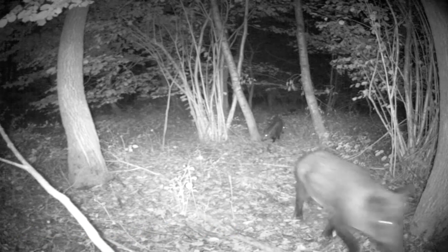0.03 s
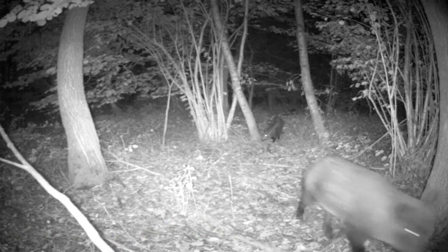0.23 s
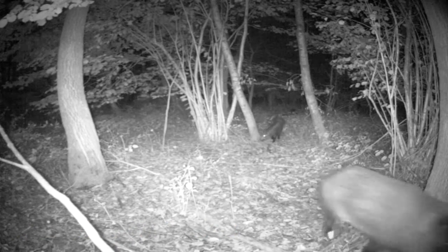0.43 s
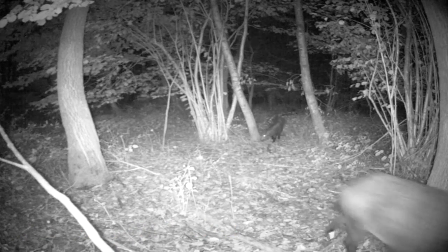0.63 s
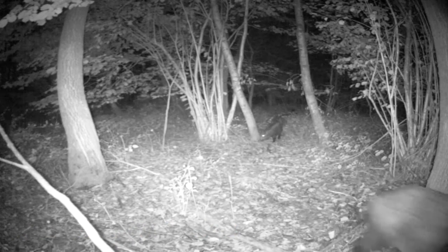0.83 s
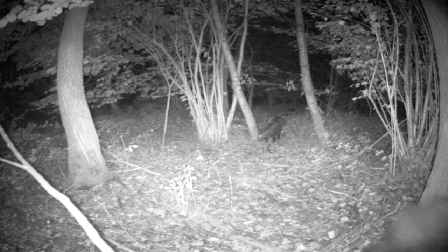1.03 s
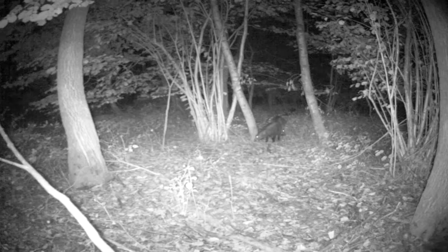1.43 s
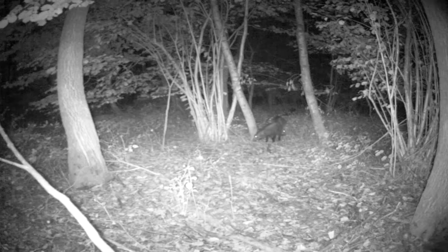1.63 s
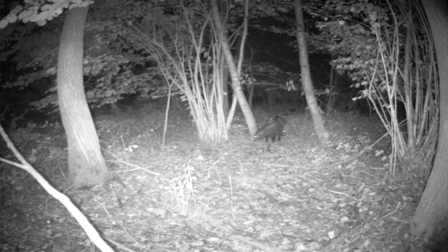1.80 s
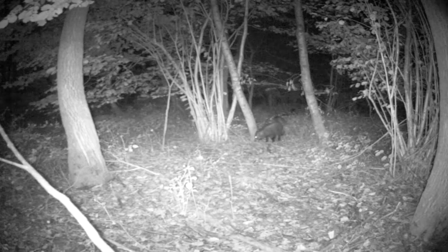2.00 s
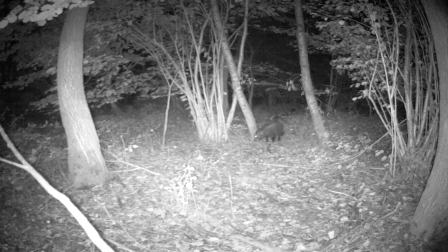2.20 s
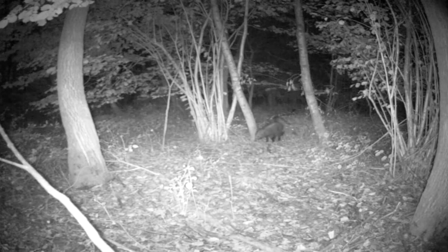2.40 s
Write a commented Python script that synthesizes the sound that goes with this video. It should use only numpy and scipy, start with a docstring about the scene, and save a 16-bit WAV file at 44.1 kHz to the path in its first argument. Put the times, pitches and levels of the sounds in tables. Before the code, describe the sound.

A wild boar walks through dry leaves, crunching them and snapping twigs with a few dull thuds. Passing close to the microphone, it gives one deep, rough grunt, then steps on through the quiet night wood.

```python
"""A wild boar walks through dry leaves past a trail camera in a quiet wood at night.
Each step crushes leaves and snaps twigs, which make the camera's housing ring. Stiff leaves scrape
and the heaviest steps thud. Just past the camera the boar gives one deep grunt: slow throat pulses
that start rough, crack a few times and end in a soft growl. Faint air and rumble lie underneath."""
import sys
import numpy as np
from scipy import signal
from scipy.fft import rfft, irfft
from scipy.io import wavfile
from scipy.ndimage import uniform_filter1d

SR = 44100
rng = np.random.default_rng(int(sys.argv[2]) if len(sys.argv) > 2 else 0)


def transcribe(u):
    """Save the signal u as a 16-bit wav file named by the first command-line argument.

    u: samples, shape (n,) or (channels, n), limited to [-1, 1]; the rate is SR.
    q: integer samples, one column per channel.
    """
    v = np.clip(np.atleast_2d(u).T, -1, 1)
    q = np.round(v * 32767).astype(np.int16)
    wavfile.write(sys.argv[1], SR, q)


N = 112454

# the crisp treble of thin leaves: pitch_hz, gain_db
CRISP_TONE = [(1000, -47.5), (6000, -7.5), (9000, -1.5), (10700, 0), (13000, -11), (15000, -12),
              (16000, -16)]


def undb(db):
    """Turn decibels into a volume factor."""
    return 10 ** (np.asarray(db) / 20)


def unit(x):
    """Scale a signal to an average power of 1."""
    return x / np.sqrt(np.mean(x ** 2))


def colour(x, points, size=8192):
    """Shape the tone along (pitch_hz, gain_db) points; white noise keeps its power."""
    hz, db = np.array(points, float).T
    log_hz = np.log(np.fft.rfftfreq(size, 1 / SR) + 1)
    gain = unit(undb(np.interp(log_hz, np.log(hz), db)))
    # fold the filter so that it never sounds before its input
    cepstrum = irfft(np.log(gain))
    cepstrum[1:size // 2] *= 2
    cepstrum[size // 2 + 1:] = 0
    return signal.oaconvolve(x, irfft(np.exp(rfft(cepstrum))))[:N]


def ring(x, modes):
    """Let a sound ring at each (pitch_hz, width_hz, gain_db) resonance."""
    return sum(undb(db) * signal.lfilter(*signal.iirpeak(hz, hz / width, fs=SR), x)
               for hz, width, db in modes)


def wobble(rate_hz):
    """A smooth random wander, about 1 in size."""
    hold = int(SR / rate_hz)
    stairs = np.repeat(rng.standard_normal(N // hold + 1), hold)
    return unit(uniform_filter1d(uniform_filter1d(stairs, hold), hold)[:N])


def bursts(times, levels_db, fade_s, spike=0, size=4096):
    """Fading puffs of noise with an optional first spike, each with the energy of 5 ms at its level."""
    out = np.zeros(N + size)
    for at, db in zip(times, levels_db):
        puff = rng.standard_normal(size) * np.exp(-np.arange(size) / SR / fade_s)
        puff[0] += spike * np.linalg.norm(puff)
        start = int(at * SR)
        out[start:start + size] += undb(db) * puff / np.linalg.norm(puff) * np.sqrt(0.005 * SR)
    return out[:N]


def night(t):
    """Still air, a wavering rumble, faint low swells from the wood and the camera's thin whine."""
    # tones of the air, the rumble and the swells: pitch_hz, gain_db
    air_tone = [(76, -24.5), (130, -0.5), (263, -7), (706, -2.5), (1970, -12.5), (2180, -22.5), (2510, -13),
                (3530, -20), (4150, -12.5), (5180, -20.5), (7750, -14.5), (11800, -26), (16000, -21.5)]
    rumble_tone = [(12, -11), (27, -0.5), (39, -5.5), (52, 1.5), (66, -6), (110, -15), (200, -28),
                   (500, -49.5)]
    swell_tone = [(40, -29), (80, -1), (125, -20), (170, -5), (280, -13), (420, -18.5), (700, -20.5),
                  (1500, -47)]
    # the rumble slowly sinks: time_s, level_db
    rumble_levels = [(0, -33.5), (1.1, -34.5), (1.9, -36), (2.55, -37.5)]
    # low swells: peak_s, width_s, level_db
    swells = [(.22, 0.1, -38.5), (.52, 0.19, -43.5), (.88, .04, -52), (2.48, 0.13, -37.5)]
    air_db, swell_top_hz, whine_hz, whine_db = -42.5, 1780, 15725, -65
    air = undb(air_db) * unit(colour(rng.standard_normal(N), air_tone))
    rumble_level = undb(np.interp(t, *np.array(rumble_levels).T))
    rumble = rumble_level * unit(colour(rng.standard_normal(N), rumble_tone))
    swell_level = sum(undb(db) * np.exp(-((t - at) / width) ** 2) for at, width, db in swells)
    swell = colour(rng.standard_normal(N), swell_tone)
    swell = signal.sosfilt(signal.butter(4, swell_top_hz, fs=SR, output="sos"), swell)
    whine = undb(whine_db) * np.sqrt(2) * np.sin(2 * np.pi * whine_hz * t)
    return air + rumble + swell_level * unit(swell) + whine


def leaves(t):
    """Each step swells and fades, crushing leaves into clusters of tiny cracks over a soft rustle."""
    # steps in the leaves: peak_s, rise_s, fall_s, relative_level_db, extra_treble_db
    steps = [(0.059, .01, 0.032, -33.5, 5), (.135, 0.033, 0.071, -33, -0.5),
             (.205, 0.057, 0.073, -37.5, -18), (0.499, 0.041, 0.085, -32.5, -7),
             (0.569, 0.02, 0.084, -29, 0.5), (0.68, 0.027, 0.037, -31.5, 4.5),
             (.895, 0.057, 0.034, -29.5, -6), (.97, 0.025, 0.081, -30, -10),
             (1.04, 0.045, 0.12, -36.5, -3.5), (1.165, 0.0065, 0.049, -32, -20),
             (1.335, 0.04, 0.054, -35, -14), (1.431, 0.016, 0.014, -28.5, -9),
             (1.473, .025, 0.042, -31.5, -14), (1.786, 0.083, .1, -35, -12), (1.9, 0.054, 0.11, -42.5, -8),
             (2.03, 0.028, 0.03, -44.5, 5.5), (2.129, 0.0095, 0.021, -30, -7),
             (2.181, .012, 0.062, -29.5, -13), (2.41, 0.018, 0.0075, -38.5, -10)]
    # tone of crushed leaves: pitch_hz, gain_db
    leaf_tone = [(200, -12), (500, 5.5), (1100, 6.5), (1800, 1), (3000, -2), (4200, -1), (7300, 4),
                 (9000, -1), (12000, -5.5), (16000, -6)]
    cracks_per_s, crack_fade_s, spread_db, rustle = 1400, 0.00033, 4, 0.8
    crush_power, crisp_power = 0, 0
    for at, rise, fall, db, treble_db in steps:
        shape = np.exp(-np.where(t < at, ((t - at) / rise) ** 2, (t - at) / fall))
        power = (undb(db) * shape) ** 2
        crush_power += power
        crisp_power += power * undb(treble_db) ** 2
    starts = rng.random(N) < cracks_per_s / SR
    sizes = starts * undb(spread_db * np.minimum(rng.exponential(size=N), 3.8))
    crack_power = signal.lfilter([1], [1, -np.exp(-2 / (crack_fade_s * SR))], sizes ** 2)
    clusters = undb(2.25 * wobble(rate_hz=90))
    texture = unit(np.hypot(unit(np.sqrt(crack_power)), rustle) * clusters)
    crush = colour(np.sqrt(crush_power) * texture * rng.standard_normal(N), leaf_tone)
    crisp = colour(np.sqrt(crisp_power) * texture * rng.standard_normal(N), CRISP_TONE)
    return undb(-2) * (crush + crisp)


def twigs():
    """Sharp cracks scatter off the ground; thick twigs add a woody knock, thin leaves a crisp top."""
    # twigs and stiff leaves breaking: start_s, relative_level_db, extra_wood_db, extra_treble_db
    snaps = [(0.0598, -32.5, 4.5, 7.5), (0.0902, -26.5, -22, -1.5), (0.1332, -34.5, -25, 9.5),
             (.203, -27, -4, -17), (.5375, -26, -20, -16), (0.5646, -21.5, -30, -10),
             (0.6008, -16.5, 2.5, -3.5), (0.643, -17, -15, -3), (0.736, -28.5, -3, -28),
             (0.815, -28.5, -0.5, -29), (0.905, -27, -3.5, 1.5), (0.9553, -20.5, -1, -3.5),
             (0.9769, -26.5, -1, -16), (.989, -34, 12.5, -16), (1.0453, -27.5, -12, -5),
             (1.0674, -27, -1, -8), (1.0767, -24, -3, -20), (1.0793, -11, -9.5, -9), (1.159, -26, -5, -18),
             (1.3211, -34.5, 6, 1), (1.4285, -24.5, 0.5, 0), (1.528, -27.5, -6, -19), (1.6467, -37, 0, 2.5),
             (1.692, -32, -8, -19), (1.702, -41, 12.5, -20), (1.7634, -24, 3, -15),
             (2.123, -27.5, -3.5, -21), (2.171, -25.5, -3.5, -16)]
    # tones of the crack and the woody knock: pitch_hz, gain_db
    crack_tone = [(300, -32), (1200, 1), (2200, -18), (3200, -3), (6500, 1.5), (9000, -5.5), (12000, -15.5),
                  (16000, 3)]
    wood_tone = [(80, -22), (250, -6), (700, -3), (1300, -3), (2000, -4), (3200, -16), (6000, -27)]
    at, db, wood_db, treble_db = np.array(snaps).T
    crack = bursts(at, db - 2, fade_s=0.0016, spike=0.24)
    scatter = bursts(at, db - 13.5, fade_s=0.018)
    knock = bursts(at, db + wood_db - 4.5, fade_s=0.0027, spike=0.24)
    crisp = bursts(at, db + treble_db - 1, fade_s=0.0013)
    return colour(crack + scatter, crack_tone) + colour(knock, wood_tone) + colour(crisp, CRISP_TONE)


def housing(sound):
    """The camera's housing rings along with the leaves and twigs, adding to their sound."""
    # resonances of the housing: pitch_hz, width_hz, gain_db
    resonances = [(2510, 100, 11.5), (3030, 165, 13.5), (3896, 110, 10), (4226, 180, 4), (4860, 100, 5.5),
                  (5730, 200, -0.5), (6940, 450, 1.5), (7640, 320, -1), (10700, 460, -7.5),
                  (12900, 200, -1.5), (13500, 320, -23)]
    return sound + ring(sound, resonances)


def scrapes(t):
    """A stiff leaf dragged by a hoof crackles around a pitch of its own."""
    # dragged leaves: peak_s, half_length_s, pitch_hz, level_db
    drags = [(0.061, 0.0077, 4140, -37), (.447, 0.002, 7600, -32), (0.683, 0.016, 4120, -31),
             (0.872, 0.019, 4320, -46.5), (.978, 0.0015, 6400, -22), (1.17, 0.0081, 6500, -40),
             (1.474, 0.015, 6650, -35.5), (2.133, 0.0074, 3160, -36), (2.182, 0.011, 3020, -34.5)]
    out = 0
    for at, half_length, hz, db in drags:
        crackle = rng.standard_normal(N) * undb(2.6 * wobble(rate_hz=400))
        band = [(hz, 0.17 * hz, 0)]
        level = undb(db) * np.exp(-((t - at) / half_length) ** 2 / 2)
        out += level * unit(ring(ring(crackle, band), band))
    return out


def hooves():
    """The heaviest steps thud dully on the soil."""
    # hooves landing: start_s, level_db
    thuds = [(0.6012, -20.5), (0.884, -31.5), (1.0144, -37)]
    # tone of a thud: pitch_hz, gain_db
    thud_tone = [(40, -10), (130, -4), (230, 0), (450, -1.5), (900, -11), (2000, -36)]
    return colour(bursts(*np.array(thuds).T, fade_s=0.0038), thud_tone)


def grunt(t):
    """Slow, uneven throat pulses: a deep chest tone, a rough growl, a rasp ringing throat and snout."""
    # how fast the throat pulses: time_s, pitch_hz
    pitch = [(1.27, 48.2), (1.402, 53.2), (1.42, 53.67), (1.498, 51.5), (1.552, 51.93), (1.62, 50.96),
             (1.7, 48.9), (1.78, 44)]
    # levels of the four parts: time_s, chest_db, rasp_db, growl_db, snout_db
    levels = [(1.24, -50, -50, -66, -73), (1.279, -28, -45, -35, -40.5), (1.322, -23.5, -34, -29.5, -29),
              (1.38, -17, -35, -29.5, -29), (1.42, -18, -37.5, -27, -44), (1.47, -19, -43, -32, -47),
              (1.58, -23.5, -49.5, -32, -51), (1.68, -23.5, -46.5, -38, -50), (1.769, -25, -52, -42, -60),
              (1.8, -57, -70, -68, -72)]
    # harmonics of the chest tone: pitch_multiple, start_gain_db, end_gain_db
    harmonics = [(1, 3.5, 2.5), (2, -19, -15.5), (3, -9, -36), (4, -24.5, -13), (5, -28, -18)]
    # resonances of the throat and the snout: pitch_hz, width_hz, gain_db
    throat = [(354, 92, 0), (1193, 150, 2), (1685, 130, -5.5), (2520, 95, -2.5)]
    snout = [(554.4, 55, 0)]
    # tone of the low growl: pitch_hz, gain_db
    growl_tone = [(30, -20), (72, 8.5), (100, 5.5), (125, -9.5), (170, -2), (225, -8.5), (250, -4.5),
                  (290, -26), (500, -37)]
    cycles = np.cumsum(np.interp(t, *np.array(pitch).T)) / SR
    times, *levels_db = np.array(levels).T
    progress = np.clip((t - times[0]) / (times[-1] - times[0]), 0, 1)
    chest = 0
    for multiple, start_db, end_db in harmonics:
        wavering = cycles + 0.034 * wobble(rate_hz=18)
        gain = undb(start_db + (end_db - start_db) * progress)
        chest += gain * np.cos(2 * np.pi * (multiple * wavering + rng.random()))
    # each cycle gives one pulse and a fading puff of noise
    pulses = np.diff(np.floor(cycles), prepend=0) * undb(3 * wobble(rate_hz=49.5))
    puffs = np.exp(-(cycles % 1) / 0.93) * rng.standard_normal(N)
    voice = unit(pulses) + 1.56 * unit(puffs)
    rasp = signal.sosfilt(signal.butter(4, 3000, fs=SR, output="sos"), ring(voice, throat))
    growl = colour(rng.standard_normal(N), growl_tone)
    nasal = ring(ring(voice, snout), snout)
    sounding = (t > times[0]) & (t < times[-1])
    return sounding * sum(unit(part) * undb(np.interp(t, times, db))
                          for part, db in zip((chest, rasp, growl, nasal), levels_db))


def croaks(t):
    """At the height of the grunt, single pulses slap hard and make the mouth ring."""
    # hard pulses: start_s, level_db, lowest_ring_extra_db, highest_ring_extra_db
    slaps = [(1.3738, -20, -9.5, 3), (1.409, -21, -17, 1), (1.428, -26.5, -28, 3), (1.4478, -31.5, -13, 16),
             (1.514, -38, -15, 13)]
    # resonances of the mouth: pitch_hz, width_hz, gain_db
    mouth = [(565, 47, 10.5), (1152, 80, 1), (1260, 105, 4.5), (1743, 140, -2)]
    out = 0
    for at, db, low_db, high_db in slaps:
        age = np.maximum(t - at, 0)
        croak = 0
        for (hz, width, gain_db), extra_db in zip(mouth, (low_db, 0, 0, high_db)):
            pitch_hz = hz * (1 + 0.017 * rng.standard_normal())
            fade = undb(gain_db + extra_db) * np.exp(-np.pi * width * age)
            croak += fade * np.sin(2 * np.pi * (pitch_hz * age + rng.random()))
        croak *= 1 - np.exp(-age / 0.0015)  # quick rise
        croak *= 1 + 0.3 * wobble(rate_hz=700)  # roughness
        out += undb(db) * croak * np.sqrt(0.0096 * SR / np.sum(croak ** 2))  # energy of 9.6 ms
    return out


def scene():
    """The boar's steps and grunt, with the quiet wood around them."""
    t = np.arange(N) / SR
    crunch = undb(-4.5) * housing(leaves(t) + twigs())
    footfalls = crunch + scrapes(t) + hooves()
    return (footfalls + grunt(t) + croaks(t) + night(t))[None]


def record(dry):
    """The camera cuts off the highest treble."""
    top_hz = 15850
    return signal.sosfilt(signal.ellip(10, 0.2, 70, top_hz, fs=SR, output="sos"), dry)


dry = scene()
out = record(dry)
transcribe(out)
```